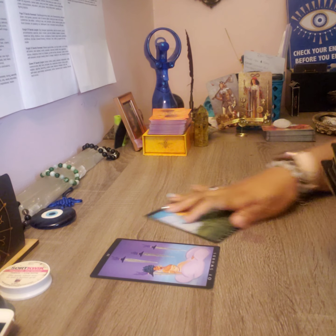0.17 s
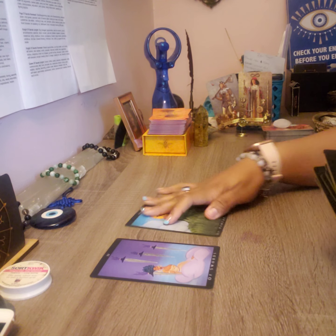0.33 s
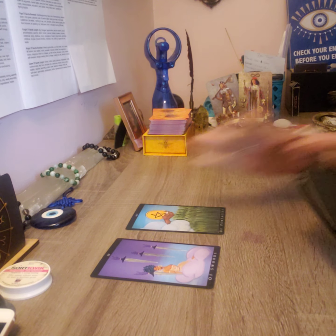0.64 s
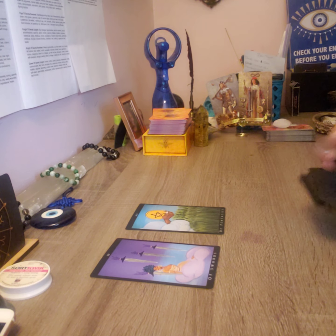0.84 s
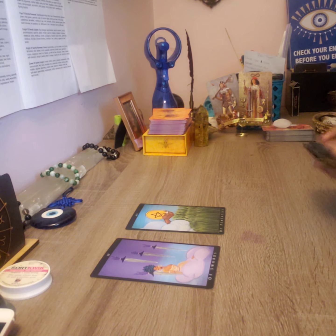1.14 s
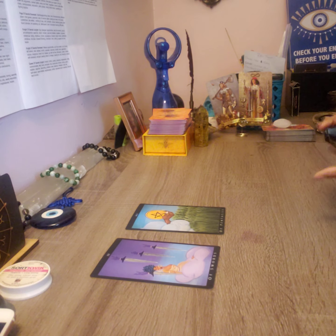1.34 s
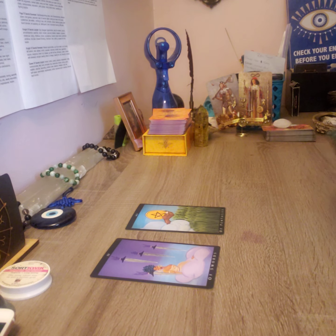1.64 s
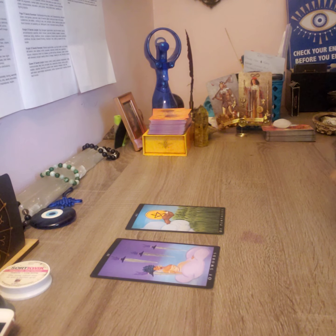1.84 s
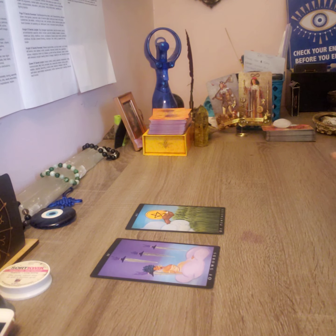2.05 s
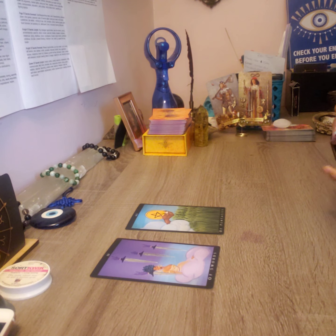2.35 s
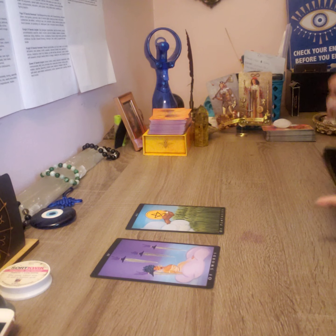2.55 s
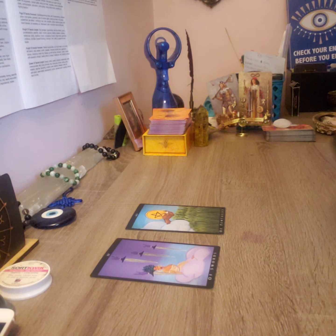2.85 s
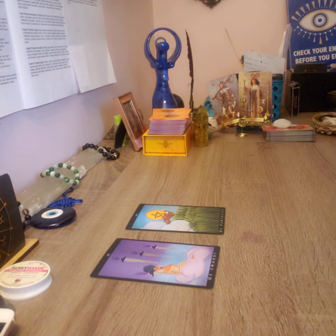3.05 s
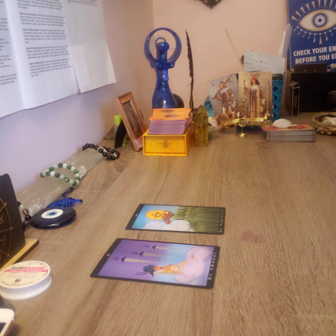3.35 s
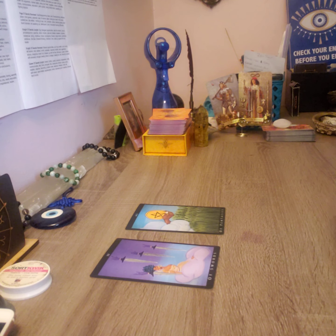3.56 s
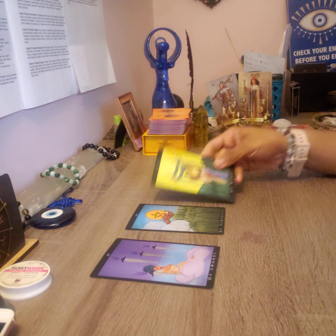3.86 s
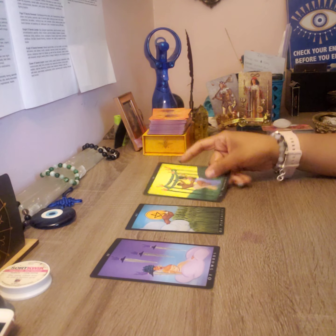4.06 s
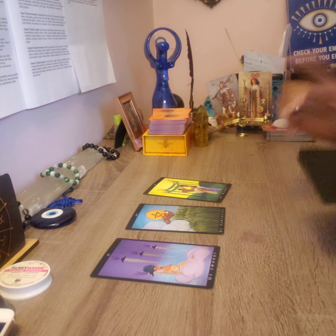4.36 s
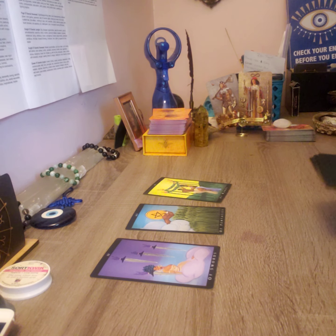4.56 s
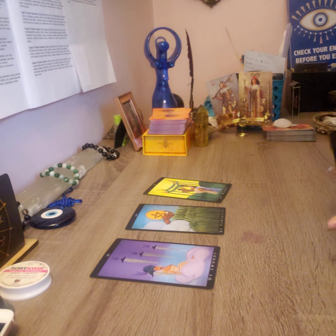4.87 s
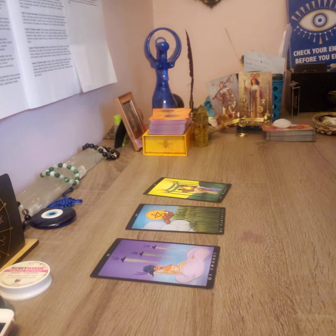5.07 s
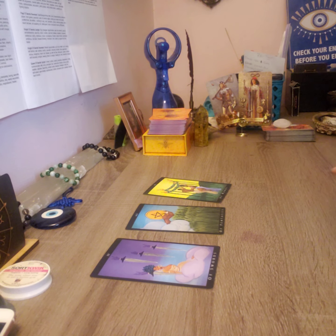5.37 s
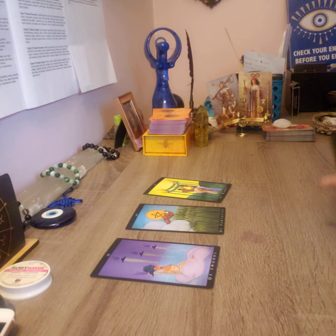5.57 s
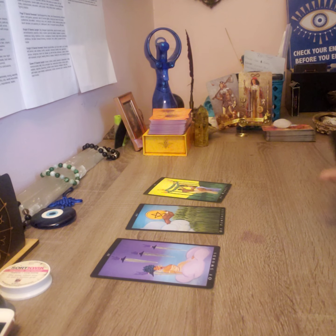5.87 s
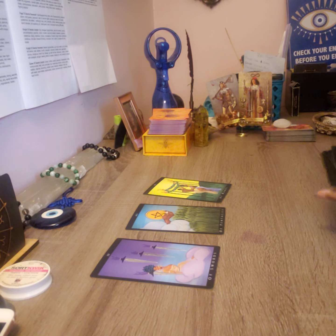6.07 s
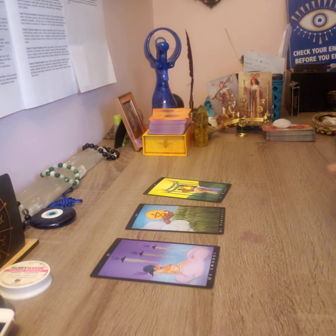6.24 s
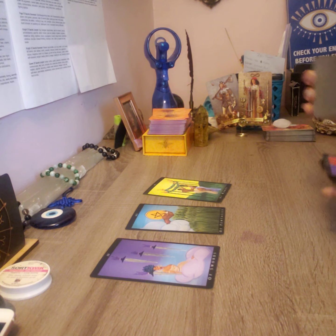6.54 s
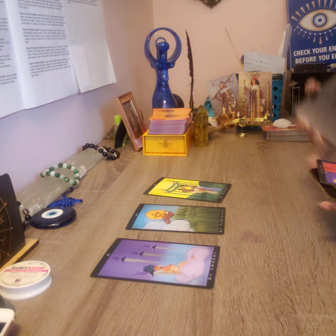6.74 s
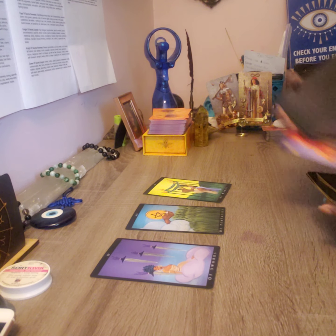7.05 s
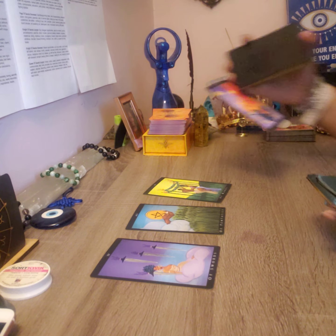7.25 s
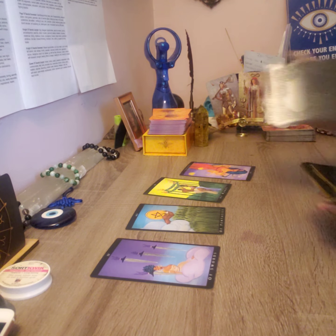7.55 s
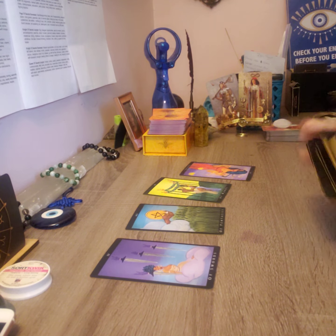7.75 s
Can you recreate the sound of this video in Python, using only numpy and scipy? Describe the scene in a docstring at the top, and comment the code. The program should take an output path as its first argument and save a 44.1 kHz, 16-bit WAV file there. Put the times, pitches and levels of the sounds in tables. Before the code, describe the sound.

Close to the microphone, stiff cards are shuffled by hand and laid one at a time on a wooden desk. Single cards tap and slide down at the start, in the middle and near the end. Between them come two runs of shuffling, with hissing slides, crisp snaps and dull desk thuds, the second joined by tiny bead clinks. A low wavering hum fills the pauses in the small room.

```python
"""At a wooden desk in a small quiet room, stiff cards are shuffled overhand and laid down near a phone.
Friction makes the faces hiss as they slide; impacts make edges tick and packets slap the deck, and the
harder blows set the desk thudding. The air between parting packets resonates, and bracelet beads clink
as the wrist jerks. A low wavering hum and a faint hiss fill the pauses."""
import sys
import numpy as np
from scipy import signal
from scipy.fft import rfft, irfft
from scipy.io import wavfile
from scipy.ndimage import uniform_filter1d

SR = 44100
rng = np.random.default_rng(int(sys.argv[2]) if len(sys.argv) > 2 else 0)


def pcm_store(signal):
    """Save signal as 16-bit PCM."""
    levels = np.round(np.clip(np.atleast_2d(signal), -1, 1) * 32767)
    wavfile.write(sys.argv[1], SR, levels.astype(np.int16).T)


N = 348814


def gain_of(db):
    """Amplitude ratio of a level in decibels."""
    return 10 ** (np.asarray(db) / 20)


def unit_rms(x):
    """Normalisation to an rms of 1."""
    return x / np.sqrt(np.mean(x ** 2) + 1e-20)


def curve_at(points, hz):
    """Interpolation on a logarithmic frequency axis."""
    f, value = np.transpose(points)
    return np.interp(np.log(hz + 1), np.log(f + 1), value)


def resonances(hz, peaks):
    """Incoherent addition: resonances sum in power, giving a magnitude spectrum of rms 1."""
    return unit_rms(np.sqrt(sum(gain_of(2 * db) / (1 + (2 * (hz - f) / w) ** 4) for f, w, db in peaks)))


# Resonances of the hum: centre_hz, width_hz, level_db
HUM_BANDS = [(46.5, 46, -7), (58.5, 2.5, 0.5), (75, 20, -4), (88, 8.3, -9.5), (120.9, 12, -11.5),
             (171, 120, -13.5), (264, 90, -19)]
# Wavering of the hum: time_s, level_db
HUM_LEVELS = [(0.0, -51.5), (0.7, -51), (0.99, -48.5), (1.21, -52.5), (1.98, -49.5), (2.36, -52.5),
              (4.36, -49), (4.67, -58.5), (5.24, -51), (5.51, -50), (5.93, -59.5), (6.25, -45.5),
              (6.43, -57.5), (7.91, -54.5)]

def hum():
    """Structure-borne sound: noise in a few low resonances drones through the walls and the desk."""
    hz = np.fft.rfftfreq(N, 1 / SR)
    power = sum(gain_of(2 * db) / w / (1 + (2 * (hz - f) / w) ** 4) for f, w, db in HUM_BANDS)
    colour = np.sqrt(power) * np.minimum(hz / 42, 1) ** 3
    left, unrelated = rfft(rng.standard_normal((2, N)))
    apart = np.clip(hz / 450, 0, 1)  # bass is alike at both microphone ports
    right = np.sqrt(1 - apart ** 2) * left + apart * unrelated
    drone = unit_rms(irfft(colour * np.array([left, right]), N))
    level_db = np.interp(np.arange(N) / SR, *np.transpose(HUM_LEVELS))
    return drone * gain_of(level_db) * gain_of([[1.5], [-2]])


# Spectrum of the noise floor: frequency_hz, density_db
HISS_SPECTRUM = [(180, -30.5), (300, -6.5), (321, -20), (373, -12), (406, -10), (1290, -19), (8580, -30.5),
                 (15200, -27), (16500, -32)]

def hiss(level_db=-76):
    """Noise floor: microphone and room noise, uncorrelated between the two ports."""
    hz = np.fft.rfftfreq(N, 1 / SR)
    colour = gain_of(curve_at(HISS_SPECTRUM, hz) + PORT_SIDES * curve_at(PORT_BALANCE, hz))
    return gain_of(level_db) * unit_rms(irfft(colour * rfft(rng.standard_normal((2, N))), N))


# Body resonances of one card and of a packet: centre_hz, width_hz, level_db
CARD_BODY = [(900, 900, -6), (1800, 900, 0), (3300, 1200, 3)]
PACKET_BODY = [(285, 121, -7), (518, 140, -3), (773, 230, 0), (1080, 200, -3), (1380, 330, 1.5),
               (2300, 2000, -1.5)]
# Spans in which one card is handled alone: start_s, end_s
SINGLE_CARD_SPANS = [(0, 1.3), (3.25, 3.58), (4.2, 4.4), (6.9, 7.5)]

def body_at(time_s):
    """Body resonance: a single card in the hand rasps higher than a packet."""
    return CARD_BODY if any(start <= time_s < end for start, end in SINGLE_CARD_SPANS) else PACKET_BODY


# Resonances of the air gap snapping shut: centre_hz, width_hz, level_db
AIR_SNAP = [(11000, 8300, 0.87), (12800, 11000, -2.9)]

def card_colour(hz, pitch_hz, body, body_db, snap_db, spread):
    """Power summation of a broad edge resonance, the body and the snap, both relative to the edge."""
    edge = unit_rms(np.exp(-.5 * (np.log((hz + 1) / pitch_hz) / spread) ** 2))
    low = gain_of(body_db) * resonances(hz, body)
    high = gain_of(snap_db) * resonances(hz, AIR_SNAP)
    return np.sqrt(edge ** 2 + low ** 2 + high ** 2)


# Faces sliding over each other or the desk; rise and fade each span 20 dB:
# crest_s, level_db, rise_s, fade_s, body_db, fine_hiss_db, pitch_hz
SLIDES = [(.045, -59, .2, .06, -25, 2, 5700), (.192, -53, .015, .3, -9, -22, 5400),
          (.284, -46, .08, .32, -6, -14, 4800), (.43, -52, .15, .12, -6, -16, 4500),
          (.529, -46.5, .012, .055, -4, -15, 4060), (.578, -44, .02, .24, -2, -18, 4200),
          (.65, -45, .2, .045, -3, -15, 3600), (.878, -51, .22, .05, -6, -32, 4300),
          (.958, -55.5, .08, .05, -13, -40, 5500), (1.005, -60, .012, .08, 0, -30, 3200),
          (1.235, -68, .08, .1, -12, -25, 5500), (1.4, -75, .5, .05, -14, -18, 6500),
          (1.442, -47, .015, .28, -16, -12, 5400), (1.658, -49.5, .3, .12, -3.5, -12, 5030),
          (1.806, -51.5, .05, .45, -8, -8, 5100), (1.969, -42.5, .02, .078, -9, -6, 4830),
          (2.086, -58, .04, .45, -5, -3, 4600), (2.302, -40.5, .045, .16, -9, -40, 4430),
          (2.5, -66, .1, .9, -8, -30, 4300), (2.624, -52.5, .035, .07, -10, -17, 4480),
          (2.945, -62, .02, .15, -15, 3, 5500), (3.023, -55, .12, .16, -4.5, 0, 5100),
          (3.161, -57, .07, .125, -11, -2, 5650), (3.276, -40.5, .01, .11, -6, -40, 4550),
          (3.401, -47, .1, .09, -19, -9, 4800), (3.471, -50, .2, .22, -9, -30, 5000),
          (3.63, -57, .2, .12, -1, -16, 4700), (3.89, -64, .2, .08, -8, 4, 5800),
          (4.003, -57.5, .01, .22, 0, -22, 4950), (4.226, -40.5, .008, .124, -14, -26, 5100),
          (4.47, -66, .08, .22, -20, -9, 6200), (4.611, -62, .22, .07, -20, -20, 6900),
          (4.823, -61.5, .025, .2, -14, -16, 8240), (4.947, -47.5, .1, .12, -11, -1, 4560),
          (5.108, -45, .008, .083, -10, -14, 5740), (5.275, -47.5, .11, .127, -4, -6, 5150),
          (5.45, -64, .3, .4, -8, 3, 5600), (5.531, -47, .012, .05, -16, 9, 5840),
          (5.56, -35.5, .04, .098, -18, -29, 5080), (5.719, -49.5, .03, .073, -8, -3, 5540),
          (5.877, -47, .157, .115, -8, -3, 4500), (5.996, -55, .025, .2, -4, -12, 4800),
          (6.12, -60, .2, .03, -8, 8, 5500), (6.235, -55, .02, .07, 14, -5, 4900),
          (6.158, -36.5, .02, .134, -7.5, -9, 4750), (6.297, -38.5, .015, .09, -7, -7, 4830),
          (6.49, -62, .25, .12, -8, -24, 4740), (6.99, -72, .04, .3, -5, -15, 4520),
          (7.543, -44, .022, .095, -9, -25, 4770), (7.7, -67, .3, .8, -14, -28, 5200),
          (7.8, -49, .012, .12, -5, -14, 5000)]

def sliding_faces(catches_per_s=110):
    """Sliding friction: dense noise with sparse catches swells and fades, each slide in its own colour."""
    catches = gain_of(4 * np.minimum(rng.exponential(1, N), 3.5)) * (rng.random(N) < catches_per_s / SR)
    left, unrelated = rng.standard_normal((2, N))
    faces = np.array([left, .75 * left + .66 * unrelated])  # a wide source is only partly coherent
    rub = unit_rms(faces * (1 + .45 * unit_rms(uniform_filter1d(catches, 40))))
    hz, t, spectra = signal.stft(rub, SR, nperseg=256, noverlap=192)
    power = 0
    for crest_s, db, rise_s, fade_s, body_db, fine_db, pitch_hz in SLIDES:
        grip = gain_of(db - 20 * np.maximum((crest_s - t) / rise_s, (t - crest_s) / fade_s))
        colour = card_colour(hz, pitch_hz, body_at(crest_s), body_db, fine_db, spread=.55)
        power = power + np.outer(colour, grip) ** 2
    flicker = uniform_filter1d(rng.standard_normal(spectra.shape[1:]), 5, axis=0)
    flicker_db = 1.5 * unit_rms(uniform_filter1d(flicker, 20, axis=1))
    spectra = spectra * np.sqrt(power) * gain_of(flicker_db)
    return signal.istft(spectra, SR, nperseg=256, noverlap=192)[1][:, :N]


# Blows that reach the desk top: start_s, level_db
DESK_BLOWS = [(0.226, -43), (1.43, -42.5), (1.64, -33.5), (1.963, -29), (2.285, -34), (4.226, -28),
              (4.933, -36.5), (5.275, -31), (5.554, -26.5), (5.868, -34), (6.142, -33), (6.29, -32),
              (7.534, -42)]
# Modes of the desk top: pitch_hz, level_db, t60_s
DESK_MODES = [(80, -7, .12), (125, -7, .12), (176, -6.5, .09), (288, -2.5, .045)]

def desk_thuds(attack_s=.0013):
    """Modal vibration: a soft push sets the damped modes of the desk top ringing."""
    blows, t = np.zeros(N), np.arange(8000) / SR
    for start_s, db in DESK_BLOWS:
        blows[round(start_s * SR)] = gain_of(db)
    ring = sum(gain_of(db - 60 * t / t60) * np.sin(2 * np.pi * hz * t) for hz, db, t60 in DESK_MODES)
    return signal.oaconvolve(blows, ring * (1 - np.exp(-t / attack_s)) / abs(ring).max())[:N]


def minimum_phase(magnitude):
    """Causality: the Hilbert transform of the log spectrum gives the phase of the promptest response."""
    log = np.log(np.r_[magnitude, magnitude[-2:0:-1]] + 1e-4)
    return np.fft.ifft(np.exp(np.conj(signal.hilbert(log)))).real[:len(magnitude)]


def unrolling_taps(landing_ms):
    """Progressive contact: one sharp tap, then smaller ones, unlike at each port, as the edge unrolls."""
    timing, shared, extra = rng.random((3, 26))
    unroll_ms, lateness = np.clip(landing_ms - 1, 0, 8), timing ** 1.5
    at = ((unroll_ms + 2.1) * SR / 1000 * lateness).astype(int)
    strength = min(.4 + .2 * unroll_ms, .9) * (1 - .5 * lateness)
    taps = np.zeros((2, 500))
    for port, size in zip(taps, (2 * shared - 1, shared + extra - 1)):
        np.add.at(port, at, strength * size)
    taps[:, 0] -= 1
    return taps


# A single edge ticks: start_s, level_db, body_db, snap_db
EDGE_TICKS = [(.24, -16, -11, -28), (.2552, -16, -20, -24), (.2626, -19, -16, -25), (.2775, -18, -19, -17),
              (.2906, -16, -19.5, -14.5), (.321, -17.5, -22.5, -15), (.339, -26.5, -14, -20),
              (.8333, -23, -25, -29), (1.4372, -12.5, -9, -5), (1.975, -24, -8, -3),
              (2.2849, -15.5, -8, -18), (2.3227, -1, -15, 4.5), (2.357, -13, -11.5, -1),
              (2.4168, -21, -13, -26), (2.4442, -27, -17, -22), (2.4683, -28.5, -15, -25),
              (2.664, -25, -15, -27), (2.913, -36, -20, 0), (2.941, -31, -20, 0), (3.1613, -25, -9, -4.5),
              (3.197, -25.5, -14.5, -5.5), (3.2674, -8, -16, -34), (3.276, -9, -21.5, -34.5),
              (3.293, -24, -20, -3), (3.3934, -24.5, -17, -24), (3.4616, -19, -22.5, -21),
              (3.4913, -27, -24, -23), (3.5308, -27, -23, -22), (3.5546, -24, -23, -23),
              (3.684, -29.5, -4.5, -32), (3.922, -38, -20, -5), (4.228, -10.5, -18, -21),
              (4.2501, -14.5, -17, -17), (4.268, -16.5, -20.5, -26), (4.2814, -15.5, -22, -23),
              (4.295, -23.5, -17, -21), (4.445, -39.5, -18, 3), (5.41, -34, -15, 5), (6.252, -30, -15, -8),
              (6.965, -52, -3, -25), (7.007, -49, -6, -15), (7.321, -54, -20, -20), (7.522, -38, -15, -15),
              (7.5347, -11, -12, -9), (7.808, -29, -2, -15), (7.819, -27, -2, -12)]
# A face or packet lands flat: start_s, level_db, body_db, snap_db, pitch_hz, landing_ms
FLAT_LANDINGS = [(.5695, -13, -11, -16, 4300, 7.5), (.617, -21, -6, -26, 3850, 5.3),
                 (1.795, -30, 4, -10, 4500, 3), (1.8122, -30, 2, -5, 5060, 3),
                 (1.9632, -16.5, 3, -14.5, 3900, 4.7), (2.085, -25.5, 8.5, -11.5, 3860, 4),
                 (2.1435, -24.5, 1, -15.5, 3730, 1.9), (2.1688, -31, -9.5, -8, 5060, 5.6),
                 (2.251, -30, -10, -15, 4500, 3), (2.2643, -21, -12, -25, 4100, 3.4),
                 (2.294, -9, 8, -.5, 4880, 1.8), (2.3317, -19.5, -1, -14, 4010, 1.6),
                 (3.4039, -29, -6, -13, 5270, 4.3), (3.9978, -25.5, -.5, -13, 5200, 5.5),
                 (4.2188, -30, -12.5, -9, 6400, 5.3), (5.102, -28, -1, -24, 4750, 4.8),
                 (5.425, -34, 8.5, 1, 5060, 2.2), (5.7202, -21.5, 9, -6.5, 5000, 1.2),
                 (6.001, -29, 8, -15, 4500, 3), (6.052, -26, -12, 12, 7250, 4),
                 (6.1436, -3, -1, -16, 5300, 1.6), (6.2878, -14, 8, -15, 4560, 5.7),
                 (6.2982, -10.5, 6, -6.5, 4890, 3)]
# A packet slaps the deck, its near edge touching dully just before:
# slap_s, level_db, body_db, snap_db, touch_lead_ms, touch_db, knock_db
PACKET_DROPS = [(1.5597, -20, -10.5, -6, 8.4, -29, -4), (1.6586, -10.5, -7, -10, 12, -21, 5),
                (4.945, -9.5, -8.5, -5, 7.6, -22.5, 3), (5.2767, -8.5, -11.5, -13, 10.6, -19, 4),
                (5.5566, -2.5, -2, -7, 9.8, -22, -3), (5.879, -8, -2, -16, 12.8, -19.5, 4)]
# Resonances of that near edge's knock: centre_hz, width_hz, level_db
KNOCK_BODY = [(640, 220, 0), (1400, 900, -7)]
TICK_HZ, TICK_MS = 5500, 1.2
SLAP_HZ, SLAP_MS = 6300, 1.3
TOUCH_SNAP_DB, TOUCH_HZ, TOUCH_MS = -25, 3400, 2.8

def card_impacts():
    """Impulse excitation: the taps of each landing ring the resonances of edge, body and air gap."""
    ticks = [(*row, TICK_HZ, TICK_MS) for row in EDGE_TICKS]
    slaps = [(*row[:4], SLAP_HZ, SLAP_MS) for row in PACKET_DROPS]
    landings = [(*row, body_at(row[0])) for row in ticks + FLAT_LANDINGS + slaps]
    touches = [(slap_s - lead_ms / 1000, db, knock_db, TOUCH_SNAP_DB, TOUCH_HZ, TOUCH_MS, KNOCK_BODY)
               for slap_s, *_, lead_ms, db, knock_db in PACKET_DROPS]
    out, hz = np.zeros((2, N + 2000)), np.fft.rfftfreq(2048, 1 / SR)
    for start_s, db, body_db, snap_db, pitch_hz, landing_ms, body in landings + touches:
        ring = minimum_phase(card_colour(hz, pitch_hz, body, body_db, snap_db, spread=.36))
        sound = signal.fftconvolve(unrolling_taps(landing_ms), ring[None], axes=1)
        out[:, round(start_s * SR):][:, :sound.shape[1]] += gain_of(db) * sound / abs(sound).max()
    return out[:, :N]


# Air gaps as one packet is drawn off another: start_s, length_s, level_db, upper_hz, width_hz
AIR_GAPS = [(1.51, .14, -59, 1350, 230), (1.86, .11, -56, 1350, 300), (4.01, .16, -66, 1540, 120),
            (4.85, .09, -62, 1400, 450), (5.18, .09, -57, 1350, 330), (5.47, .08, -59, 1250, 350),
            (5.79, .08, -57, 1300, 330), (6.05, .09, -59, 1300, 350), (7.793, .08, -57, 1400, 300)]

def hollow_gaps(lower_ratio=.54, lower_db=-9):
    """Cavity resonance: two modes of the air gap colour rubbing noise, which swells and fades."""
    size = 8192
    out, hz, t = np.zeros(N + size), np.fft.rfftfreq(size, 1 / SR), np.arange(size) / SR
    for start_s, length_s, db, upper_hz, width_hz in AIR_GAPS:
        colour = resonances(hz, [(upper_hz, width_hz, 0), (lower_ratio * upper_hz, width_hz, lower_db)])
        hollow = unit_rms(irfft(rfft(rng.standard_normal(size)) * colour))
        arch = np.sin(np.pi * np.clip(t / length_s, 0, 1)) ** .5
        out[round(start_s * SR):][:size] += gain_of(db) * arch * hollow
    return out[:N]


# Beads collide as the wrist jerks: start_s, level_db
BEAD_CLINKS = [(4.9911, -49), (5.0519, -49), (5.1517, -38), (5.3517, -50), (5.4136, -52), (5.6391, -50),
               (5.768, -48), (6.0521, -40), (6.337, -48), (7.773, -59)]
# Modes of the beads: pitch_hz, level_db, t60_s
BEAD_MODES = [(14400, 0, .032), (14750, -4, .02), (10500, 3, .004)]

def bracelet():
    """Free vibration: each clink rings a pair of small hard beads of slightly different tuning."""
    out, t = np.zeros(N + 4000), np.arange(4000) / SR
    for start_s, clink_db in BEAD_CLINKS:
        tuning = rng.uniform(.985, 1.015)
        for hz, db, t60 in BEAD_MODES:
            decay = gain_of(clink_db + db - 60 * t / t60)
            out[round(start_s * SR):][:len(t)] += decay * np.sin(2 * np.pi * hz * tuning * t)
    return out[:N]


# Reverberation time of the room: frequency_hz, t60_s
ROOM_DECAY = [(100, 0.37), (500, 0.13), (2000, .25), (6000, 0.073), (15000, .14)]

def room(source, build_s=.006):
    """Reverberation: reflections build up and decay by band."""
    size, out = SR // 2, 0
    build_up = np.minimum(np.arange(size) / SR / build_s, 1)
    for turn in range(3):  # three random tails crossfade steadily, so the echo varies from hit to hit
        echoes = np.zeros((2, size))
        at = np.arange(80, size - 20, 20) + rng.integers(0, 20, (2, (size - 81) // 20))
        np.put_along_axis(echoes, at, rng.choice([-1., 1.], at.shape), 1)
        hz, t, spectra = signal.stft(echoes * build_up, SR, nperseg=256)
        apart = np.clip(hz / 900, 0, 1)[:, None]  # the ports share the bass
        spectra[1] = np.sqrt(1 - apart ** 2) * spectra[0] + apart * spectra[1]
        decay = gain_of(-60 * t / curve_at(ROOM_DECAY, hz)[:, None])
        tail = signal.istft(spectra * decay, SR, nperseg=256)[1]
        tail /= np.linalg.norm(tail[0])
        share = np.sqrt(2 / 3) * np.cos(np.pi * (7 * np.arange(N) / SR + turn / 3))
        out = out + signal.fftconvolve((source * share)[None], tail, axes=1)[:, :N]
    return out


# Level difference between the microphone ports: frequency_hz, left_minus_right_db
PORT_BALANCE = [(60, 3), (700, 4), (1290, 0), (2380, 2), (4400, 14), (8120, 8), (15000, 1)]
# Phase difference between them: frequency_hz, left_lead_rad
PORT_LEAD = [(150, 0), (700, .6), (1400, .7), (2700, 2.1), (5500, 2), (15000, 1.5)]
PORT_SIDES = np.array([[.5], [-.5]])  # left and right each take half of a difference

def ports(sound, direct):
    """Diffraction: the phone body shades one port and shifts the phase of direct sound between the two."""
    hz = np.fft.rfftfreq(N, 1 / SR)
    shading = gain_of(PORT_SIDES * curve_at(PORT_BALANCE, hz))
    phase = PORT_SIDES * curve_at(PORT_LEAD, hz) if direct else 0
    return irfft(rfft(sound) * shading * np.exp(1j * phase), N)


def scene():
    """Superposition: cards, desk and bracelet, direct and reverberant, over hum and hiss."""
    near = card_impacts() + desk_thuds() + gain_of(.4) * sliding_faces() + hollow_gaps() + bracelet()
    reverberant = gain_of(-6) * room(near[0])
    return ports(near, direct=True) + ports(reverberant, direct=False) + hum() + hiss()


DIP_HZ, DIP_WIDTH_HZ, DIP_DB, CUTOFF_HZ = 8500, 450, -3, 15950

def record(dry):
    """Linear filtering: a dip in the microphone's treble, then the phone's band limit."""
    hz = np.fft.rfftfreq(N, 1 / SR)
    dip = gain_of(DIP_DB * np.exp(-((hz - DIP_HZ) / DIP_WIDTH_HZ) ** 2))
    low_pass = signal.firwin(511, CUTOFF_HZ, window=("kaiser", 9), fs=SR)
    return signal.oaconvolve(irfft(rfft(dry) * dip, N), low_pass[None], "same")


dry = scene()
out = record(dry)
pcm_store(out)
```